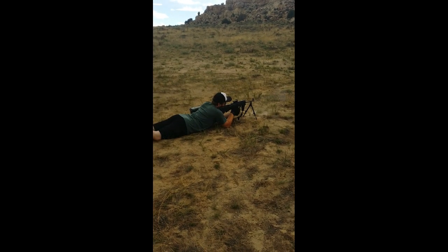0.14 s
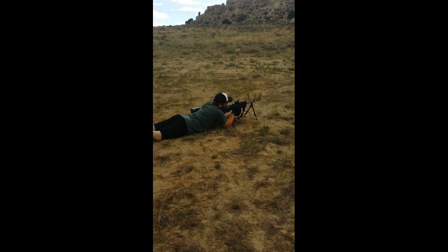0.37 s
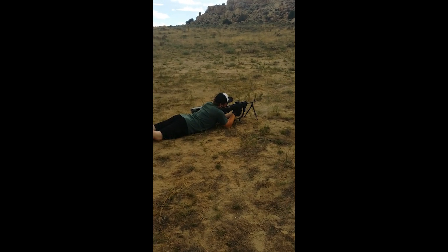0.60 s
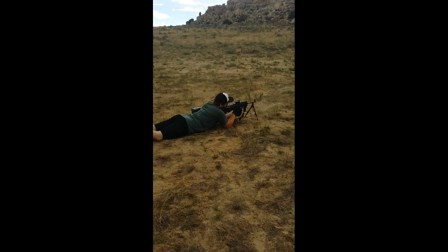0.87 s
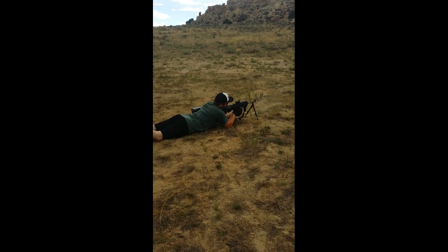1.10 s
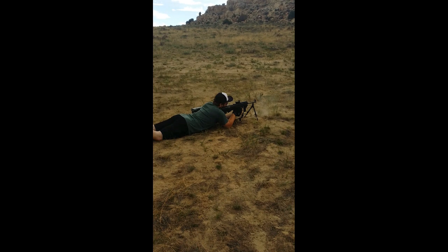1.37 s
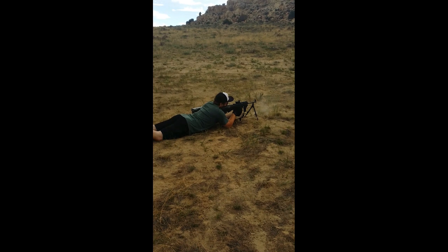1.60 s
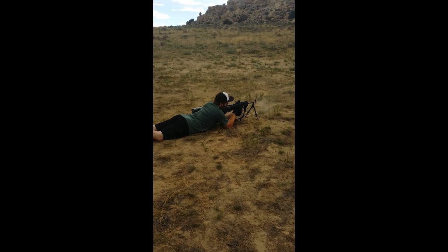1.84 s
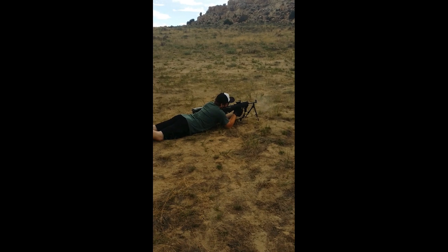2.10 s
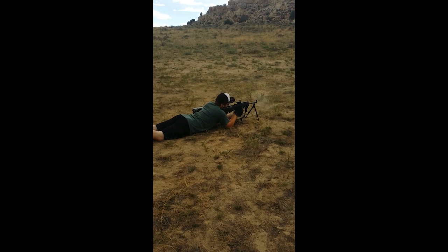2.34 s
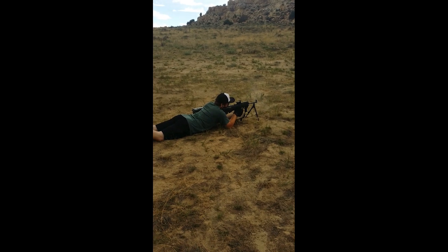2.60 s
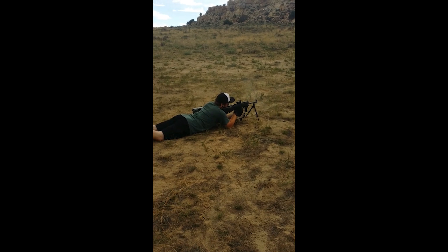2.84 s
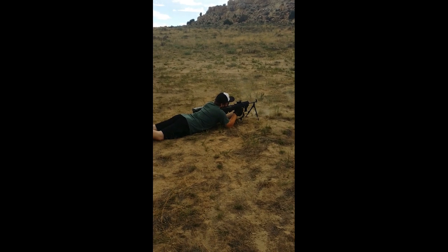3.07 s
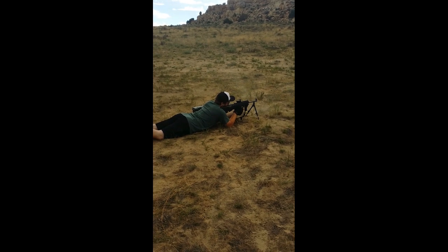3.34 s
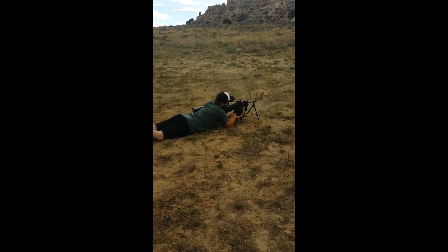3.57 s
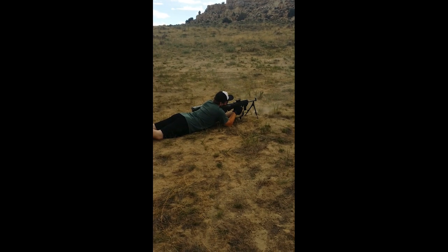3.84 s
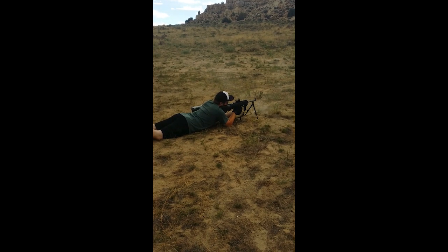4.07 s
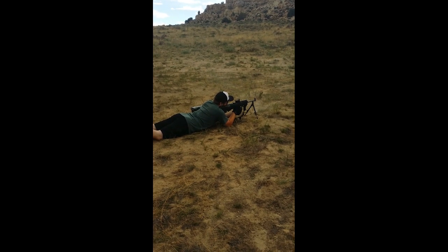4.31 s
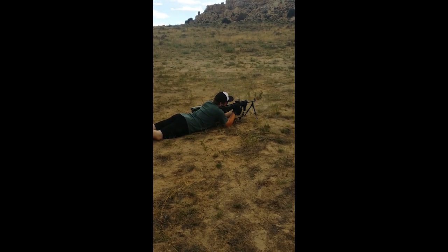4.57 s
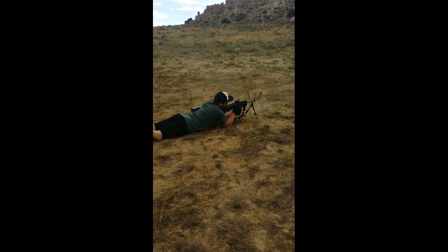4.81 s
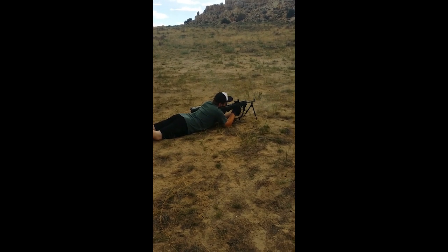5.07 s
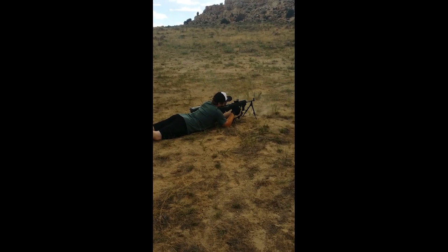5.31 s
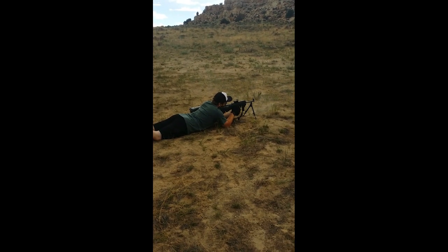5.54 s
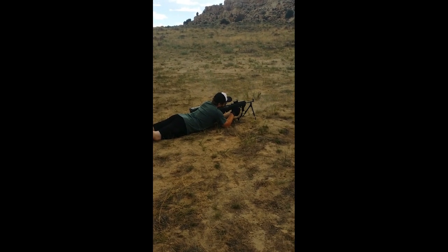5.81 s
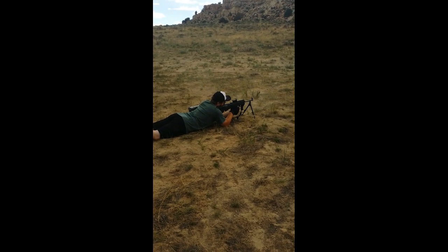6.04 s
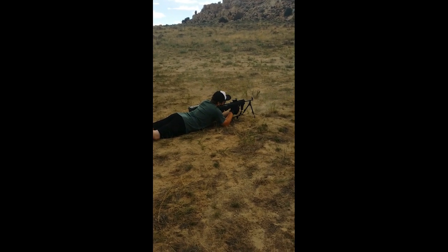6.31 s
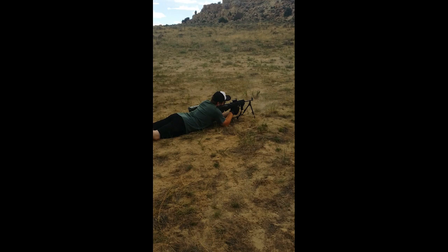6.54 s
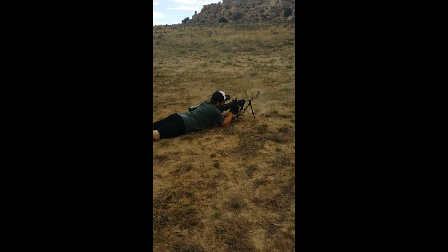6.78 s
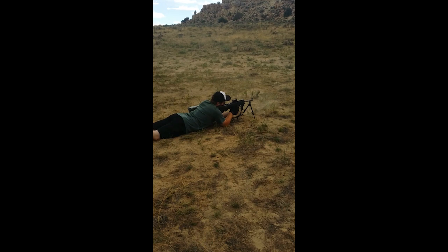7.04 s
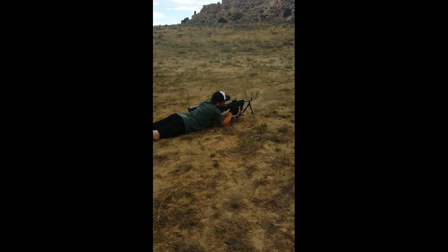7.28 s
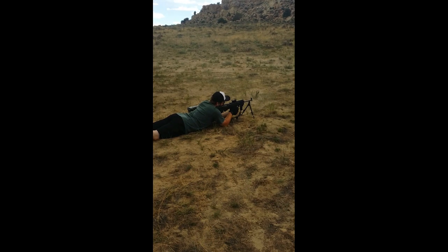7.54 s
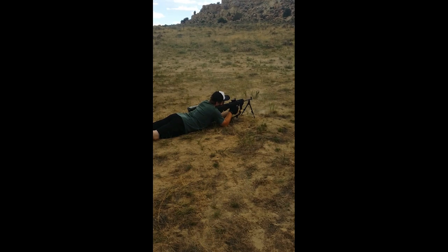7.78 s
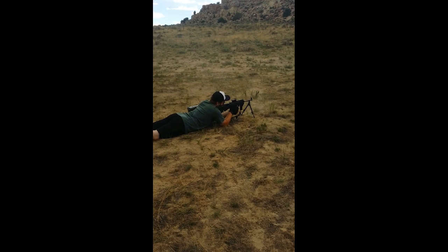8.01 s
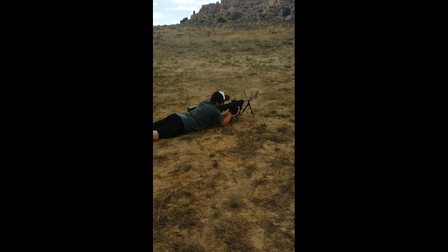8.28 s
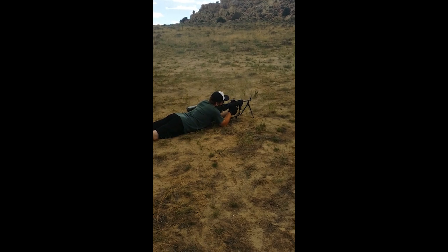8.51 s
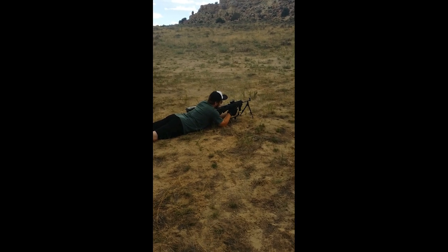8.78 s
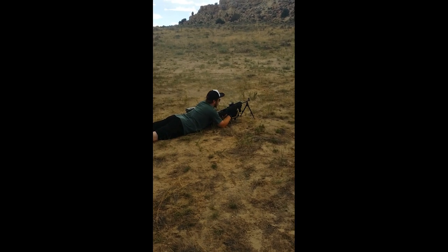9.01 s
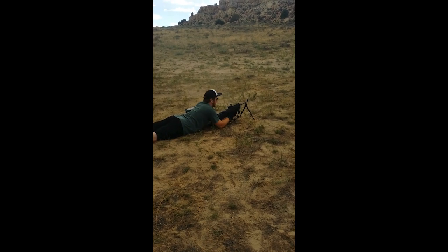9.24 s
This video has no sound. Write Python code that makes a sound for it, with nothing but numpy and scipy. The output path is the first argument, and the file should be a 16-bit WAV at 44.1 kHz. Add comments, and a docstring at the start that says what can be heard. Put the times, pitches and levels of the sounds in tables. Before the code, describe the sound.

A rifle fires nine separate shots in dry open grassland below a rocky ridge. A phone a few metres behind overloads on every blast. Each punch is followed at once by a bright steel bolt clack, low thumps and slaps from the slopes, and a ragged hiss returning from downrange, fading over about a second. Faint breeze remains at the end.

```python
"""Nine rifle shots in dry grassland below a rocky ridge, heard by a phone a few metres behind, over a light breeze.
Each shot opens with the blast: damped swings and a burst of noise that overload the phone.
Ground, slopes and rocks send it back as noise, thumps and slaps for over a second, while the bolt clacks in bright noise.
Then the bullet's crack returns from downrange as lumpy hiss, differently each time, and lone ticks stand out.
One microphone port is bright, the other muffled."""
import sys
import numpy as np
from scipy import signal
from scipy.fft import rfft, irfft
from scipy.io import wavfile
from scipy.ndimage import uniform_filter1d

SR = 44100
rng = np.random.default_rng(int(sys.argv[2]) if len(sys.argv) > 2 else 0)


def unload_wav(signal):
    """Save mono or channel-first audio to the path in sys.argv[1] as 16-bit WAV at rate SR, clipped to [-1, 1]."""
    wavfile.write(
        sys.argv[1],
        SR,
        np.round(np.clip(np.atleast_2d(signal).T, -1, 1) * 32767).astype(np.int16),
    )


def magnitude_from_level(level_db):
    """Linear magnitude for a level in decibels (20 dB per decade)."""
    exponent = np.asarray(level_db, float) / 20
    return 10 ** exponent


N = 413658  # length of the scene in samples


def band(x, lo_hz, hi_hz, order=4):
    """Band-pass, scaled so that white noise comes out near rms 1."""
    sos = signal.butter(order, [lo_hz, min(hi_hz, .45 * SR)], "band", fs=SR, output="sos")
    return signal.sosfilt(sos, x) * np.sqrt(SR / 2 / (hi_hz - lo_hz))


def colour(x, hz, gain):
    """Filter by gains given at some frequencies."""
    f = np.fft.rfftfreq(N, 1 / SR)
    return irfft(rfft(x) * np.interp(np.log(f + 1), np.log(hz), gain), N)


def add(out, x, s):
    """Mix x into out from time s on."""
    i = int(s * SR)
    n = min(x.shape[-1], out.shape[-1] - i)
    out[..., i:i + n] += x[..., :n]


def bumps(t, rows):
    """Power of short bursts (start s, dB, length s): sudden start, slower fall."""
    out = np.zeros(len(t))
    for s, db, length in rows:
        # the burst is cut off after 12 lengths, when it has become silent
        u = np.arange(int(12 * length * SR) + 2) / SR / length
        rise = np.minimum(u / .3, 1) ** 2
        add(out, magnitude_from_level(2 * db) * rise * np.exp(-u), s)
    return out


def returns(t, rows, cycles):
    """Each reflector (delay s, Hz, dB) hands back a short, smoothly swelling piece of tone."""
    out = np.zeros(len(t))
    for (delay, hz, db, *_), phase in zip(rows, rng.uniform(0, 2 * np.pi, len(rows))):
        u = t - delay
        swell = np.exp(-.5 * (u * hz / cycles) ** 2)
        out += np.sqrt(2) * magnitude_from_level(db) * swell * np.cos(2 * np.pi * hz * u + phase)
    return out


def strewn(first, last, first_hz, last_hz, db, fade_s, db_per_s, scatter_db, count):
    """Rows (delay s, Hz, dB) of reflectors at loosely even spacing, fainter with distance."""
    u, v = rng.uniform(size=count), rng.standard_normal((2, count))
    share = (np.arange(count) + u) / count
    s = first + (last - first) * share
    hz = (first_hz + (last_hz - first_hz) * share) * (1 + 0.21 * v[0])
    level_db = db + db_per_s * np.clip(s - fade_s, 0, None) + scatter_db * v[1]
    return np.transpose([s, hz, level_db])


# The colour of the breeze and far land. Each row: frequency in Hz, relative level in dB.
AIR_COLOUR = [(15, -33), (25, -9), (27, -11.5), (65, -0.5), (168, 3.5), (408, -23.5), (1350, -20.5),
              (1480, -23), (5000, -32.5), (6500, -62.5), (11000, -120)]
# Puffs of breeze. Each row: middle in seconds, level in dB of the sound below 300 Hz, half length in seconds.
BREEZE_PUFFS = [(0.028, -54.5, 0.043), (2.505, -59.5, 0.0248), (2.641, -77, .07), (2.934, -74, .025),
                (8.97, -63.5, 0.024), (9.099, -60, .02), (9.312, -64, 0.055)]
CALM_DB = -70  # level of that low sound between puffs


def breeze(clock):
    """Low lumps of air on the ports over a faint far wash."""
    hz, db = np.transpose(AIR_COLOUR)
    level = magnitude_from_level(CALM_DB)
    for s, puff_db, half in BREEZE_PUFFS:
        level = level + magnitude_from_level(puff_db) * np.exp(-.5 * ((clock - s) / half) ** 2)
    noise = colour(rng.standard_normal((2, N)), hz, magnitude_from_level(db))
    noise = noise + .6 * noise[::-1]  # the ports share part of it
    low = signal.sosfilt(signal.butter(2, 300, fs=SR, output="sos"), noise)
    # buffeting differs from port to port
    buffet = magnitude_from_level(5.5) * low.std() * band(rng.standard_normal((2, N)), 22, 90, order=2)
    far_wash = magnitude_from_level(-65.0) * (noise - low)
    return (level * (low + buffet) + far_wash) / low.std()


# The shots. Each row: start in seconds, level in dB added to each response, extra dB at the start that fades away.
SHOT_LIST = [(0.1313, -1.5, 3.5), (1.2677, -1.5, -1.5), (2.9695, -2, 1.5), (3.732, -1.5, -1.5),
             (4.62, -3, 0.3), (5.2653, -2, -1), (6.0953, -2, -1), (6.7332, -1, -2.5), (7.7473, -1, -2.5)]


def each_shot(x, order=1):
    """The same response laid at every shot; order 2 for powers."""
    out = np.zeros(x.shape[:-1] + (N,))
    early = np.exp(-np.arange(x.shape[-1]) / SR / 0.089)
    for s, db, early_db in SHOT_LIST:
        add(out, magnitude_from_level(order * (db + early_db * early)) * x, s)
    return out


# Swings of the muzzle blast. Each row: delay in seconds, frequency in Hz, time to fall by 60 dB in seconds,
# left level in dB, right level in dB.
BLAST_SWINGS = [(.002, 186, 0.031, -21, 7.5), (.006, 250, 0.085, -11.5, -10.5), (.008, 586, 0.12, -5, -6),
                (.012, 533, .1, -7.5, -10), (0.0206, 420, 0.016, -5, -17)]


def blast(t):
    """Damped swings, the first far stronger at the right port, and a ragged gas burst stronger there too."""
    swings = np.zeros((2, len(t)))
    for delay, hz, t60, *db in BLAST_SWINGS:
        u = np.clip(t - delay, 0, None)
        swings -= magnitude_from_level(db)[:, None] * np.sin(2 * np.pi * hz * u) * np.exp(-np.log(1000) * u / t60)
    gate = each_shot((t > .0017) * np.exp(-(t / 0.0046) ** 4))
    gas = gate * band(rng.standard_normal(N), 780, 2400, order=2)
    return each_shot(swings) + magnitude_from_level([[-20.], [5.]]) * gas


# All levels of the land are those before the microphone ports colour them.
# Grass and slope scattering the blast. Each row: delay in seconds, bass in dB, middle in dB,
# treble over middle in dB.
SCATTERED = [(0, -20.5, -15, -4), (0.004, -9.5, -12.5, 1.5), (0.01, -12, -10.5, -6.5),
             (0.023, -13, -8.5, -11), (0.042, -26.5, -26.5, -1.5), (0.058, -23, -26, 3.5),
             (0.09, -33, -38.5, 1), (0.123, -27.5, -36.5, 5.5), (0.148, -33, -44.5, -8),
             (0.19, -30, -68.5, 21.5), (0.263, -39.5, -66.5, 12), (0.311, -29, -43.5, -9),
             (0.423, -24, -35, -16), (0.469, -32, -40, -15.5), (0.534, -38.5, -44.5, -18),
             (0.68, -42.5, -50, -15), (0.719, -55, -59.5, -21), (0.849, -56, -53.5, -22),
             (0.932, -71.5, -77, -7.5), (1.02, -60, -69.5, -17), (1.4, -70, -78, -13)]
# The broadest slopes, each returning a low thump. Each row: delay in seconds, frequency in Hz, level in dB.
BROAD_SLOPES = [(0.04, 240, -15), (0.082, 231.6, -20.5), (0.163, 270, -21.5), (0.178, 242, -18),
                (0.299, 230, -25), (0.322, 218.3, -25), (0.36, 175.2, -19.5), (0.401, 170, -20),
                (0.424, 250, -20.5), (0.438, 230, -21), (0.834, 210, -41)]
# The largest rock faces, each returning a slap. Each row: delay in seconds, frequency in Hz, level in dB,
# treble over middle in dB.
ROCK_FACES = [(0.046, 584, -20.5, -5), (0.066, 820, -28, 2.5), (0.093, 730, -30, 7), (0.109, 626, -34, 4.5),
              (0.132, 620, -34, 6), (0.157, 503, -37, -10.5), (0.176, 450, -38, -41),
              (0.204, 548, -48, -28), (0.329, 900, -34, -15), (0.369, 835, -26, -35.5),
              (0.388, 839, -28, -26), (0.429, 518, -24, -31), (0.466, 570, -33.5, -23.5),
              (0.547, 700, -46.5, -18), (0.582, 740, -45.5, -14.5), (0.672, 875, -43.5, -23),
              (0.789, 952, -51, -15.5), (0.821, 960, -47.5, -18.5), (0.835, 744, -53.5, -14.5),
              (0.883, 842, -49.5, -17), (1.022, 1123, -49, -14.5), (1.058, 680, -57, -11),
              (1.087, 897, -56.5, -11)]
# Bands of scattered noise. Each row: low edge in Hz, high edge in Hz, offset in dB, share of the treble column
# (0-1), air loss in dB per second (negative is a gain), share of the power alike in every shot (0-1).
NOISE_BANDS = [(307, 520, -8, 0.59, 1.5, 0.9), (460, 900, -4, 0.48, -2, .9),
               (886, 1600, -6, 0.27, -6, 0.38), (1480, 2960, -10, 0.2, -4.5, 0.41),
               (3070, 5600, -9.5, 0.64, -4, 0.077), (5320, 8200, -2, 0.93, 9.5, 0.),
               (8500, 10000, -7, 1, 35.5, 0), (10200, 12200, -4.5, 1., 83.5, 0.033),
               (12200, 14600, -0.5, 0.78, 125, 0.31)]
# Lesser reflectors strewn between, low ones and then higher ones. Columns: first and last delay in seconds,
# first and last frequency in Hz, level in dB, delay in seconds where fading begins, fading in dB per second,
# scatter in dB.
LOW_HUMMOCKS = (-0.12, 1.5, 261, 157.5, -31.5, 0.49, -50, 0.5)
SMALL_BOULDERS = (0.66, 1, 698.5, 904, -45.5, 0.5, -50, 3.5)
BOULDER_TREBLE_DB = -7.5  # treble over middle


def land(t):
    """Two unrelated versions of the echoing land: bass repeats shot after shot, moving air redraws the treble."""
    delay, bass_db, mid_db, treble_db = np.transpose(SCATTERED)
    # very faint for the first 1.5 ms, then at full level; the echo fades out over its last 0.2 s
    fade = np.where(t > .0015, 1, .02) * np.clip((t[-1] - t) / .2, 0, 1)
    rumble = band(rng.standard_normal((2, len(t))), 76, 330, order=2)
    rumble = rumble * magnitude_from_level(np.interp(t, delay, bass_db) - 3.0) * fade
    slopes = BROAD_SLOPES + list(strewn(*LOW_HUMMOCKS, count=40))
    rocks = ROCK_FACES + [(*r, BOULDER_TREBLE_DB) for r in strewn(*SMALL_BOULDERS, count=10)]
    thumps_and_slaps = [returns(t, slopes, 0.63) + magnitude_from_level(2.0) * returns(t, rocks, 0.93) for _ in range(2)]
    repeated = rumble + thumps_and_slaps
    redrawn = 0
    for lo, hi, off_db, share, air_db, alike in NOISE_BANDS:
        power = magnitude_from_level(2 * np.interp(t, delay, mid_db + share * treble_db)) * fade
        rock_rows = [(s - .003, db + share * rel, .005) for s, _, db, rel in rocks]
        power = power + magnitude_from_level(5.5) * bumps(t, rock_rows)
        power = power * magnitude_from_level(2 * (off_db - air_db * t))
        same_noise = band(rng.standard_normal((2, len(t))), lo, hi)
        new_noise = band(rng.standard_normal((2, N)), lo, hi)
        repeated = repeated + np.sqrt(alike * power) * same_noise
        redrawn = redrawn + np.sqrt((1 - alike) * each_shot(power, order=2)) * new_noise
    return redrawn + each_shot(repeated)


# The bolt cycling. Each row: delay after the shot in seconds, level in dB before the shot's own level and the ports,
# length in seconds.
BOLT_CLACKS = [(0.036, -30, 0.005), (0.0905, -14.5, 0.0005), (0.115, -34, 0.014), (0.123, -22, 0.0022)]


def bolt(clock):
    """Bright steel clacks made of short noise bursts, a little different in level every shot."""
    rows = []
    for s, shot_db, _ in SHOT_LIST:
        for delay, db, length in BOLT_CLACKS:
            rows.append((s + delay, db + shot_db + 1.2 * rng.standard_normal(), length))
    return np.sqrt(bumps(clock, rows)) * band(rng.standard_normal((2, N)), 2500, 14600)


# Crack and strike of each bullet coming back. Each row: arrival in seconds, level in dB on arrival, level in dB
# it settles to, level in dB of the near ground, dull body over these in dB; all before mixing and the ports.
BULLET_RETURNS = [(0.373, -15.5, -33, -44, 1.5), (1.456, -34.5, -36.5, -25.5, -2.5),
                  (3.35, -31, -39, -35, 0), (4.0, -29.5, -26.5, -33, 5.5), (4.969, -53.5, -37.5, -55, 2.5),
                  (5.607, -41.5, -37.5, -36, 4.5), (6.436, -14.5, -29.5, -38, 4.5),
                  (6.975, -19.5, -30, -36, 1), (8.082, -40.5, -36.5, -21, 3)]
NEAR_S, NEAR_DB_PER_S = .14, -550  # the ground just downrange answers first and dies fast
SWELL_DB_PER_S, SETTLE_S = 111, 0.023
JUMP = .4  # share of the peak over the settled level that comes as a sudden step
RIDGE_S, DROP_S, DROP_DB, TAIL_S = .41, .045, -19, .56  # the return drops at the ridge, leaving a weak tail
DULLING_DB_PER_S = 52.5  # later returns come from further off and carry more body


def bullet(clock):
    """Power of the bright and the dull part of each return: near ground, swell, settling, drop at the ridge."""
    bright = body = 0
    for (shot, *_), (s, peak_db, hold_db, near_db, body_db) in zip(SHOT_LIST, BULLET_RETURNS):
        d = clock - shot
        over_db = peak_db - hold_db
        swell_db = peak_db - JUMP * over_db - SWELL_DB_PER_S * (s - clock)
        settling_db = hold_db + over_db * np.exp(-np.abs(clock - s) / SETTLE_S)
        db = np.where(clock < s, swell_db, settling_db)
        db = db + DROP_DB * np.clip((d - RIDGE_S) / DROP_S, 0, 1)
        near = magnitude_from_level(2 * (near_db + NEAR_DB_PER_S * np.clip(d - NEAR_S, 0, 1)))
        edge = np.clip(np.minimum((d - NEAR_S) / 0.022, (TAIL_S - d) / 0.029), 0, 1)
        power = edge * (magnitude_from_level(2 * db) + near)
        dulling_db = DULLING_DB_PER_S * (np.clip(d, 0, TAIL_S) - RIDGE_S + 0.0676)
        bright = bright + power
        body = body + power * magnitude_from_level(2 * (body_db + dulling_db))
    return bright, body


def downrange(clock):
    """Returns of the bullet: a ragged hiss over a duller body."""
    bright, body = bullet(clock)
    # the ground downrange is uneven, so the return comes in lumps
    steps = np.repeat(rng.standard_normal(N // 200 + 1), 200)[:N]
    lumps = magnitude_from_level(2.8 * uniform_filter1d(steps, size=200))
    noise, other = rng.standard_normal((2, 2, N))
    hiss = magnitude_from_level(-11.5) * band(noise, 1600, 3200)
    hiss += magnitude_from_level(-13.5) * band(other, 3200, 8300, order=8)
    hiss += magnitude_from_level(-46.0) * band(noise, 8300, 10500)
    dull = magnitude_from_level(-10.5) * band(other, 590, 1500)
    return lumps * (np.sqrt(bright) * hiss + np.sqrt(body) * dull)


# Lone ticks and slaps. Each row: start in seconds, level in dB before mixing and the ports,
# duller knock over that level in dB, length in seconds.
LONE_TICKS = [(0.302, -21.5, -24, 0.0086), (0.3223, -13, -28, 0.0066), (0.375, -15, -1, 0.0024),
              (1.45, -13, -19, 0.0034), (1.629, -45, 8, 0.003), (2.617, -58, -15.5, 0.003),
              (3.087, -9, -13, 0.0013), (3.1066, -3, -11, 0.00058), (3.3006, -42, -4, 0.0034),
              (3.493, -40, -12, 0.003), (4.1, -25, 12.5, 0.0027), (4.7351, -28.5, -27.5, 0.002),
              (4.9142, -43, -13, 0.003), (5.007, -45, -11, 0.003), (6.345, -23.5, 4, 0.004),
              (6.3964, -17, 3.5, 0.0026), (6.435, -11, -7, 0.0019), (6.88, -18, -22, 0.0031),
              (6.971, -10.5, -9, 0.0042), (8.6694, -65, -11, 0.0028), (8.9494, -59.5, -7, 0.0034),
              (9.105, -59, -0.5, 0.0036)]


def lone_ticks(clock):
    """Short bursts of broad noise, each with a duller knock beneath."""
    noise, other = rng.standard_normal((2, 2, N))
    tick_power = bumps(clock, [(s, db, length) for s, db, _, length in LONE_TICKS])
    knock_power = bumps(clock, [(s, db + knock_db, length) for s, db, knock_db, length in LONE_TICKS])
    broad = magnitude_from_level(-12.0) * band(noise, 1800, 9000) + magnitude_from_level(-26.0) * band(other, 9000, 13000)
    return np.sqrt(tick_power) * broad + magnitude_from_level(-2.0) * np.sqrt(knock_power) * band(other, 910, 2100)


# Microphone ports. Each row: frequency in Hz, left gain in dB, right gain in dB, likeness of the two (0-1).
PORT_COLOUR = [(30, -9, -6.5, 0.9), (102, -1, 1, 1), (250, 0.5, 2.5, 0.8), (700, 5.5, 0.5, 0.3),
               (1410, 2, -3, 0.8), (2260, 7.5, 0.5, .8), (4500, 10.5, -14, 1), (5960, 6, -24.5, 0.4),
               (6673, 11, -24.5, 0.7), (7630, 3.5, -39.5, .6), (11600, -1, -27, 0.3),
               (16000, -8.5, -26, 0.5)]
RIGHT_LAG = 10  # samples from one port to the other


def ports(pair):
    """Shared and unshared parts of the field reach two ports of unlike colour, the right a little late."""
    hz, left_db, right_db, like = np.transpose(PORT_COLOUR)
    shared = colour(pair[0], hz, magnitude_from_level(left_db) * like)
    unshared = colour(pair[1], hz, magnitude_from_level(left_db) * np.sqrt(1 - like ** 2))
    right = np.roll(colour(pair[0], hz, magnitude_from_level(right_db)), RIGHT_LAG)
    return np.array([shared + unshared, right])


def scene():
    """Shots with their echoes over the breeze."""
    t, clock = np.arange(int(1.6 * SR)) / SR, np.arange(N) / SR
    field = land(t) + bolt(clock) + downrange(clock) + lone_ticks(clock)
    return breeze(clock) + blast(t) + ports(field)


def input_hiss(dry):
    """Steady noise of the phone's input that sinks under loud sound and creeps back over seconds."""
    power = (dry ** 2).mean(0)
    # loudness of about the last 0.1 s
    loud = np.sqrt(uniform_filter1d(np.roll(power, 2200), size=4400) + 1e-12)
    memory = np.sqrt(signal.lfilter([1 / SR / 3.], [1, 1 / SR / 3.9 - 1], power))
    hiss = magnitude_from_level(-64) * band(rng.standard_normal((2, N)), 3000, 14500)
    return hiss / (1 + (loud / magnitude_from_level(-52.0)) ** 1.3) / (1 + memory / magnitude_from_level(-31.5))


def band_limit(x):
    """A steep low-pass at the top of the band."""
    return signal.sosfilt(signal.butter(12, 15690, fs=SR, output="sos"), x)


def record(dry):
    """Overload rounds off the blast, hiss joins it, and the phone passes 60 Hz to 14.6 kHz."""
    clipped = dry / (1 + np.abs(dry / .92) ** 6) ** (1 / 6)
    top = signal.cheby1(8, 1, 14600, fs=SR, output="sos")
    bottom = signal.butter(1, 60, "high", fs=SR, output="sos")
    mix = signal.sosfilt(np.vstack([top, bottom]), clipped + input_hiss(dry))
    return band_limit(np.clip(mix, -1, 1))


dry = scene()
out = record(dry)
unload_wav(out)
```